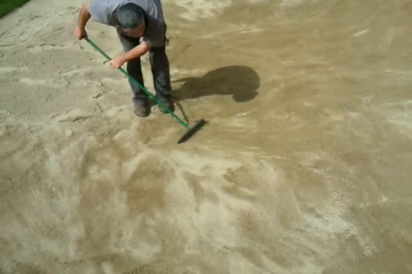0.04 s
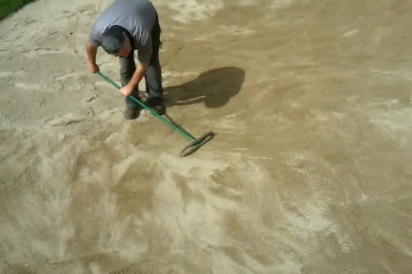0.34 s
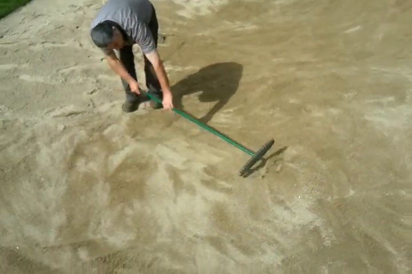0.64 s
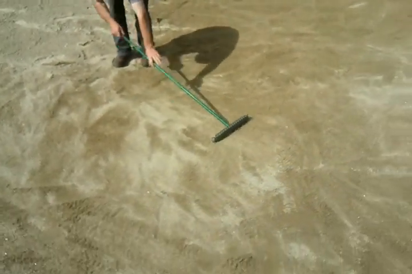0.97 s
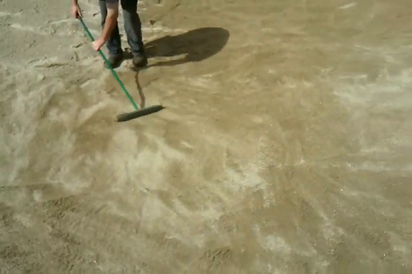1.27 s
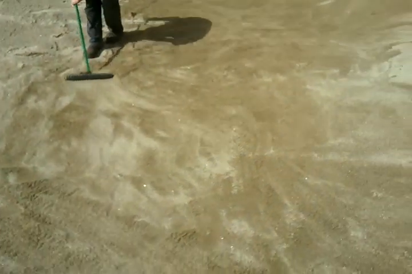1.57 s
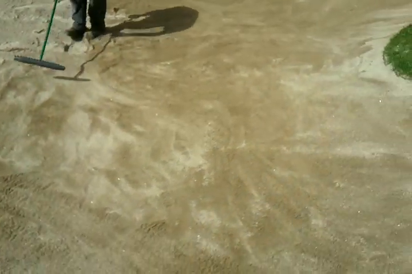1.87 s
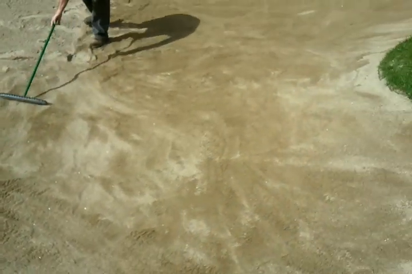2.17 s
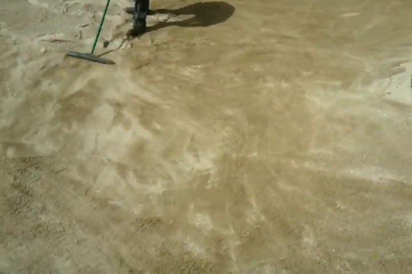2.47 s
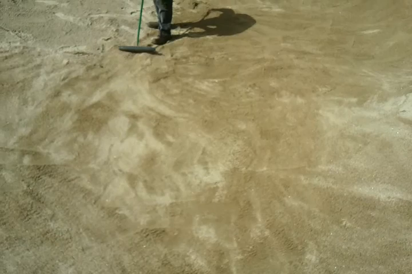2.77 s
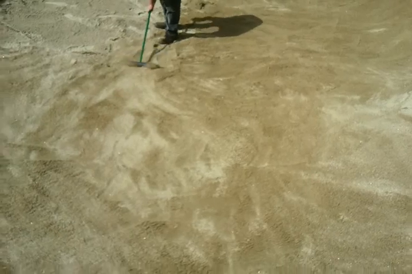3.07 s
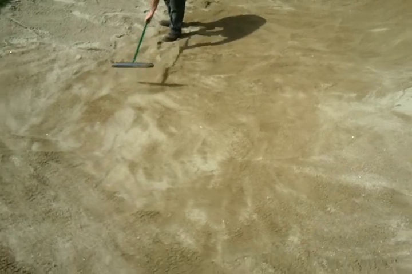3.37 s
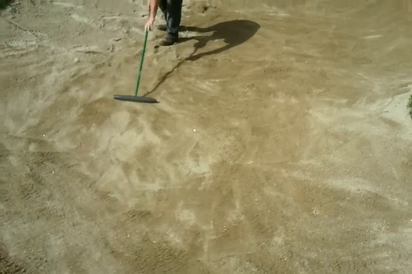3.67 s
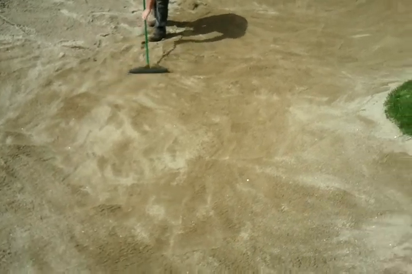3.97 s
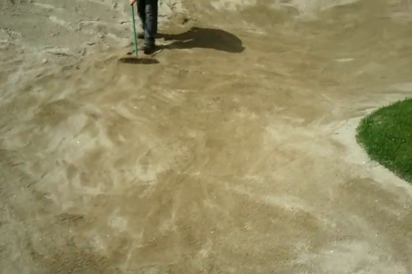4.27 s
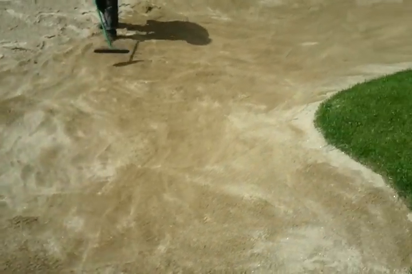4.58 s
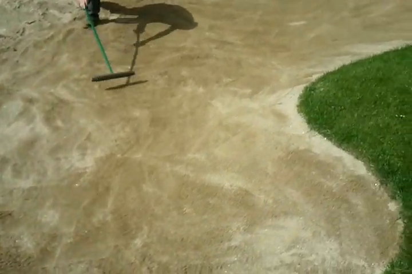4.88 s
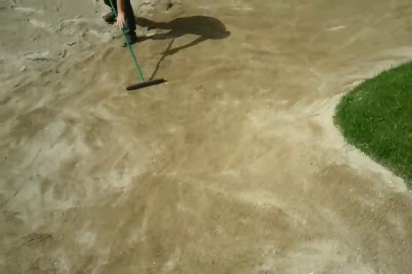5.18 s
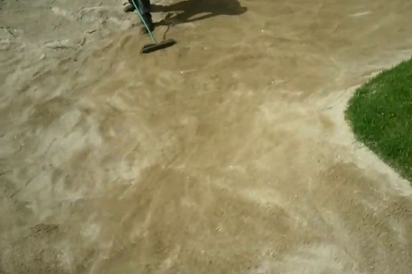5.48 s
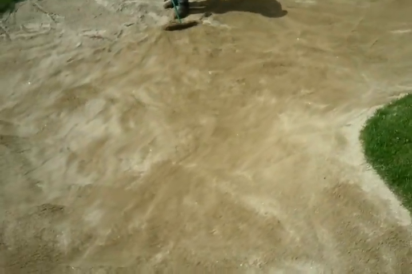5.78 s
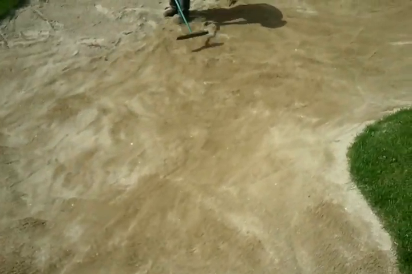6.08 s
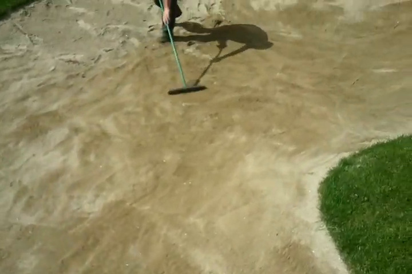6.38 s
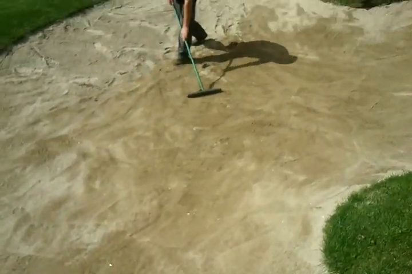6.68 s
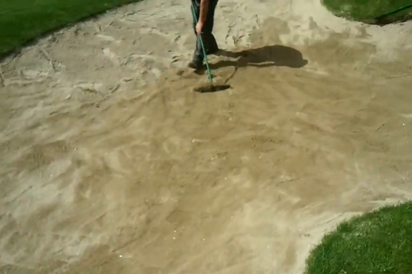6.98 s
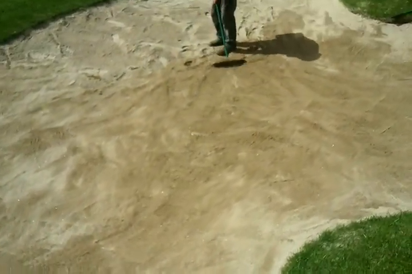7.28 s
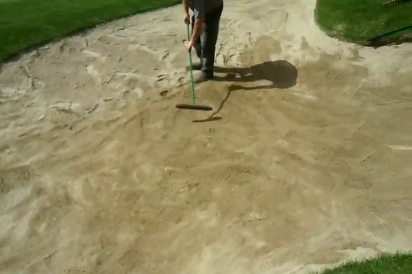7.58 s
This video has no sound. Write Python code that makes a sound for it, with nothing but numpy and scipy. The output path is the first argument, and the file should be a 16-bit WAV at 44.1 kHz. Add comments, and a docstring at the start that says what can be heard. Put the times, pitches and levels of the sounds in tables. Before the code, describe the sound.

A rake is pushed and pulled through sand a few metres away, making soft, gritty scrapes over a steady rush of wind in distant trees. After about a second, gusts start to rumble on the hand-held microphone, growing much stronger midway with thumps and sharp pops. A thin hiss climbs in pitch and the camera casing clicks hard twice. Faint raking and loud gusts continue to the end.

```python
"""A rake is pushed and pulled through bunker sand, a few metres from a hand-held camera,
over the far rush of wind in trees. From about 1 s gusts buffet the microphone;
from 3.4 s the strongest eddies slap it. The camera's casing ticks faintly in the hand,
a thin hiss climbs in pitch, the casing clicks hard, and near 6 s the far rush turns duller.
Raking and gusts go on to the end."""
import sys
import numpy as np
from scipy import signal
from scipy.fft import rfft, irfft, next_fast_len
from scipy.io import wavfile
from scipy.ndimage import uniform_filter1d, map_coordinates

SR = 44100
rng = np.random.default_rng(int(sys.argv[2]) if len(sys.argv) > 2 else 0)


def generate_wav(sig):
    """Save sig (samples, or channels by samples) to the path in sys.argv[1] as 16-bit PCM at SR."""
    pcm = np.round(np.clip(np.atleast_2d(sig).T, -1, 1) * 32767).astype(np.int16)
    wavfile.write(sys.argv[1], SR, pcm)


N = 336924
TIME_S = np.arange(N) / SR

# rake strokes: t/s, attack/s, hold/s, release/s, scrape level/dB, spray re scrape/dB
STROKES = [(0, 0.0022, 0.1, 0.091, -47.5, 1.5), (0.323, .05, 0.26, .05, -51.5, 1.5),
           (0.515, .06, .11, 0.032, -46, -1.5), (1.033, 0.2, .08, .42, -46, -3),
           (1.902, 0.092, 0.12, 0.13, -50.5, -8.5), (2.27, 0.24, 0.26, 0.11, -52, 1),
           (3.145, 0.026, 0.091, 0.13, -49.5, -2), (3.815, .17, 0.067, 0.21, -47.5, -3.5),
           (4.298, 0.68, 0.42, .3, -48, -7.5), (5.665, .05, .02, 0.049, -45, -5),
           (5.775, 0.038, 0.14, 0.11, -63, 4), (6.383, 0.096, 0.12, .12, -52.5, -6.5),
           (6.648, 0.082, .03, 0.33, -48.2, -3), (7.106, 0.066, .02, 0.046, -47, -13),
           (7.295, 0.081, 0.082, .15, -54, -5.5)]
# sand spectra, one per rake pose: f/Hz, level/dB
SAND_PUSHED = [(1200, -15), (2300, 3), (2600, -4), (2900, 2), (3550, -7), (4000, 2.5), (4550, -11.5),
               (5300, -0.5), (5800, 0.5), (6250, -7.5), (6700, -0.5), (7100, -8), (7450, -4.5), (8800, -12)]
SAND_PULLED = [(1100, -19.5), (2300, 5.5), (2650, -1.5), (3200, 2.5), (3600, -2), (3950, -2), (4400, -6),
               (5000, -3.5), (5400, -3), (6200, -1), (6600, -5.5), (6950, -6.5), (8800, -16)]
SAND_TURNED = [(1200, -5), (2300, 5.5), (2600, -1.5), (3000, 0), (3250, 3.5), (3650, -8.5), (3950, -3.5),
               (4350, -11.5), (4850, -1.5), (5250, -5), (5750, 1.5), (6300, -6), (6850, -4.5), (8800, -15)]
SAND_FAR = [(1200, -7), (2200, -1), (2900, 1.5), (3600, -1), (4400, -1.5), (5400, -3.5), (6100, -2.5),
            (7200, -8.5), (8800, -17.5)]
# envelope of the far rush: t/s, level/dB
TREES_ENVELOPE = [(0, -42.5), (3.1, -43.5), (4.2, -43.5), (4.7, -43.5), (5.7, -42.5), (6.0, -45),
                  (7.64, -45.5)]
# spectra of the far rush: f/Hz, level/dB
TREES_BRIGHT = [(25, -33.5), (70, -8.5), (140, -6), (450, -2.5), (800, 1.5), (1100, 1.5), (1500, -0.5),
                (1800, -4), (2200, -15.5), (3200, -15.5), (6000, -24), (8800, -40)]
TREES_DULL = [(25, -20), (150, -3.5), (450, -5.5), (800, 0), (1050, -2.5), (1350, -6.5), (1700, -11.5),
              (2200, -15), (3200, -19), (6000, -22.5), (8800, -50)]
# rake biting into sand: t/s, level/dB, decay/s, f/Hz, bandwidth/Hz
BITES = [(0.61, -48, 0.098, 3980, 1800), (0.63, -43, 0.013, 2680, 1600), (1.028, -47.5, 0.033, 6500, 3900),
         (1.029, -42, 0.025, 3200, 2500), (1.09, -53, .18, 3950, 600), (1.17, -53, 0.14, 5460, 600),
         (2.32, -48, .03, 5650, 1500), (2.408, -51.5, 0.081, 5650, 800), (2.446, -33, 0.0054, 2300, 1600),
         (3.158, -48, .03, 4540, 3410), (3.16, -50.5, 0.21, 2960, 547)]
# gusts on the microphone: t/s, hold/s, level/dB
GUSTS = [(1.102, .03, -44), (1.335, .045, -38), (1.572, 0.0089, -38), (1.656, 0.041, -34),
         (1.936, 0.021, -41.5), (2.352, 0.54, -35.5), (3.39, .87, -26.3), (3.63, 0.19, -24),
         (4.19, 0.056, -21.5), (4.31, .1, -30), (4.44, .065, -16.2), (4.949, .22, -32.5), (5.4, 0.16, -38),
         (5.56, 1.174, -27.5), (6.42, .085, -16.3), (6.777, .18, -29.5), (7.001, .14, -34.5),
         (7.598, 0.047, -23)]
# single eddies that thump: t/s, level/dB
PUFFS = [(1.356, -30), (1.452, -33), (1.68, -25.5), (2.504, -25.5), (2.544, -23.5), (2.593, -23),
         (2.75, -26), (2.833, -28), (2.882, -27.5), (3.259, -26), (3.312, -31), (3.339, -29.5),
         (3.377, -19), (3.488, -18.5), (3.528, -20.5), (3.655, -17), (3.78, -17), (3.888, -18),
         (4.098, -18), (4.168, -16), (4.331, -18.5), (4.389, -17.5), (4.545, -19.5), (4.969, -25.5),
         (5.124, -19.5), (5.217, -27), (5.324, -26.5), (5.584, -21.5), (5.703, -18.5), (5.75, -16),
         (5.811, -16.5), (5.835, -16), (5.885, -19.5), (6.307, -19), (6.332, -18.5), (6.614, -20),
         (6.653, -18.5), (6.742, -17.5), (6.867, -19.5), (6.952, -22), (7.148, -16.5), (7.309, -31),
         (7.358, -18), (7.434, -26.5)]
# spectra of wind on the microphone: f/Hz, level/dB
RUMBLE = [(20, -27.5), (45, -18), (80, -6.5), (130, 1.5), (270, 0), (400, -6), (560, -14.5), (800, -32.5),
          (1200, -43), (2500, -74.5)]
TURBULENCE = [(200, -17), (500, -2.5), (800, -4), (1200, -14.5), (1800, -21), (2600, -26), (7000, -49)]
# eddies breaking on the microphone port: t/s, level/dB
SLAPS = [(3.413, -4.5), (3.418, -4.5), (3.567, -8.5), (3.683, -9.5), (3.749, -11), (3.795, -4),
         (3.98, -8.5), (4.169, -7.5), (4.213, -2), (4.237, -5), (4.273, -14), (4.441, 0), (4.461, -3.5),
         (4.495, -5), (6.218, -10.5), (6.391, -9.5), (6.408, -9), (6.412, -5.5), (6.433, -8.5), (6.45, -8),
         (6.478, -7.5), (6.552, -5.5), (6.71, -8.5), (6.953, -11.5), (7.612, -3.5), (7.633, -8)]
# casing clicks: t/s, peak level/dB, low-mode gain/dB
CLICKS = [(3.759, -37, -4), (3.78, -24.5, -32), (5.036, -28, -26), (5.5933, -10, -5.5), (5.597, -18.5, 0.5),
          (5.638, -19.5, -25), (5.6739, -21.5, -10.5), (5.847, -5.5, -1)]
# casing modes: f/Hz, level/dB, T60/s
CASING_MODES = [(1780, 4, 0.0022), (3460, -8, 0.0049), (5630, -9, 0.0059), (6240, -6, 0.004),
                (6800, -2.5, 0.0025)]
# hiss swells: centre t/s, level/dB, sigma/s, f/Hz, bandwidth/Hz
HISS_SWELLS = [(4.65, -55.5, 0.13, 4180, 900), (4.82, -53.5, 0.16, 3320, 400.5),
               (5.052, -49, 0.49, 1890, 905), (5.204, -45.5, 0.15, 4200, 1000),
               (5.467, -46, 0.13, 5730, 750)]


def amp(db):
    """Decibels to gain."""
    return 10 ** (np.asarray(db) / 20)


def unit(x):
    """x at rms 1."""
    return x / np.sqrt(np.mean(x ** 2) + 1e-20)


def noise():
    """White noise."""
    return rng.standard_normal(N)


def wobble(rate_hz):
    """Smooth curve through random knots."""
    return map_coordinates(rng.standard_normal(int(N * rate_hz / SR) + 4), [TIME_S * rate_hz])


def filtered(x, response):
    """x through a frequency response."""
    size = next_fast_len(N + 8192)
    return irfft(rfft(x, size) * response(np.fft.rfftfreq(size, 1 / SR)), size)[:N]


def coloured(x, spectrum):
    """x shaped by a spectrum table, at rms 1."""
    knots_hz, db = np.transpose(spectrum)
    return unit(filtered(x, lambda hz: amp(np.interp(np.log(hz + 1), np.log(knots_hz), db))))


def resonant(x, centre_hz, width_hz):
    """x through a steep-sided resonance, at rms 1."""
    def response(hz):
        damping = 1j * hz * width_hz
        return (damping / (centre_hz ** 2 - hz ** 2 + damping)) ** 2
    return unit(filtered(x, response))


def add(track, t_s, sound):
    """Mix sound into track at t_s."""
    start = int(np.clip(round(t_s * SR), 0, N - 1))
    track[start:start + len(sound)] += sound[:N - start]


def grains(rate_hz, spread_db):
    """Tiny sand collisions of uneven size."""
    return unit(noise() * (rng.random(N) < rate_hz / SR) * amp(spread_db * noise()))


def patchy(x, depth_db):
    """The scrape's colour drifts at random, in shifting peaks and dips."""
    bins = signal.stft(x, nperseg=512)[2]
    patches = uniform_filter1d(rng.standard_normal(bins.shape), size=5, axis=0)
    patches = unit(uniform_filter1d(patches, size=30, axis=1))
    return unit(signal.istft(bins * amp(depth_db * patches), nperseg=512)[1][:N])


def rake(trickle_db=-61, trickle_spray_db=-64.5, spray_hz=4700, clump_db=0.25, clump_rate_hz=45):
    """Tines shear sand in small clumps: coarse scrape and fine spray over a loose trickle."""
    scrape_power, spray_power = amp(trickle_db) ** 2, amp(trickle_spray_db) ** 2
    for t_s, attack_s, hold_s, release_s, db, spray_db in STROKES:
        age_s = TIME_S - t_s
        dig = np.clip(age_s / attack_s, 0, 1)
        ease = np.exp(-np.maximum(age_s - attack_s - hold_s, 0) / release_s)
        pressure = amp(db) * dig * ease
        scrape_power += pressure ** 2
        spray_power += (amp(spray_db) * pressure) ** 2
    poses = [coloured(grains(rate_hz=9000, spread_db=0.5), spectrum)
             for spectrum in (SAND_PUSHED, SAND_PULLED, SAND_TURNED, SAND_FAR)]
    pose_changes_s = [.9, 2.28, 4.4]
    sand = patchy(np.choose(np.searchsorted(pose_changes_s, TIME_S), poses), depth_db=1.4)
    spray = filtered(sand, lambda hz: 1 / (1 + (spray_hz / (hz + 1)) ** 8))
    clumps = amp(clump_db * wobble(clump_rate_hz))
    return clumps * (np.sqrt(scrape_power) * unit(sand - spray) + np.sqrt(spray_power) * unit(spray))


def trees(dull_at_s=5.85, crossfade_s=.04, gain_db=2.0, sway_db=.4):
    """Far wind in trees: a steady rush that turns duller late on."""
    level_db = np.interp(TIME_S, *np.transpose(TREES_ENVELOPE))
    dullness = np.clip((TIME_S - dull_at_s) / crossfade_s + .5, 0, 1)
    bright = np.sqrt(1 - dullness) * coloured(noise(), TREES_BRIGHT)
    dull = np.sqrt(dullness) * coloured(noise(), TREES_DULL)
    return amp(level_db + gain_db + sway_db * wobble(rate_hz=8)) * (bright + dull)


def bites():
    """The rake lands or catches; a short crunch of grains rings in its head."""
    out = np.zeros(N)
    for t_s, db, decay_s, hz, width_hz in BITES:
        age = np.maximum(TIME_S - t_s, 0) / decay_s
        crunch = resonant(grains(rate_hz=9000, spread_db=3), hz, width_hz)
        out += amp(db) * np.tanh(10 * age) * np.exp(-age ** 2) * crunch
    return out


def gusts(rise_s=.024, fall_s=.026, breeze_db=-52, breeze_full_s=1.5, build_db_per_s=15):
    """Wind envelope: gusts swell, hold and sink over a breeze that builds, then holds."""
    power = amp(breeze_db - build_db_per_s * np.maximum(breeze_full_s - TIME_S, 0)) ** 2
    for t_s, hold_s, db in GUSTS:
        fade = np.maximum(t_s - TIME_S, 0) / rise_s + np.maximum(TIME_S - t_s - hold_s, 0) / fall_s
        power += (amp(db) * np.exp(-fade)) ** 2
    return np.sqrt(power)


def eddies(wind, sputter_db=6, sputter_rate_hz=90, lull_db=5, lull_rate_hz=70, steady_db=-11):
    """Eddies break the wind envelope into sputter and puffs; toward steady_db the sputter evens out."""
    lull = np.clip(wobble(lull_rate_hz), 0, 1)
    sputter = unit(amp(sputter_db * np.tanh(1.3 * wobble(sputter_rate_hz)) - lull_db * lull))
    steady = np.clip(wind / amp(steady_db), 0, 1) ** 2
    power = wind ** 2 * (steady + (1 - steady) * sputter ** 2)
    puff = signal.windows.gaussian(round(.03 * SR), std=.0043 * SR)
    for t_s, db in PUFFS:
        add(power, t_s - len(puff) / 2 / SR, (amp(db) * puff) ** 2)
    return np.sqrt(power)


def buffeting(reference_db=-22, tearing_db=-21.5, bass_cut_hz=40):
    """Wind on the microphone: faster air rumbles higher; hard blasts tear into bright turbulence."""
    force = eddies(gusts())
    strength = force / amp(reference_db)
    swirl = coloured(noise(), RUMBLE)
    # levelled, so each puff sets its own size
    swirl_power = uniform_filter1d(uniform_filter1d(swirl ** 2, size=400), size=400)
    swirl = unit(swirl / np.sqrt(np.abs(swirl_power) + 0.067))
    travel_samples = np.cumsum(np.maximum(strength, .1) ** .17)
    rumble = force * map_coordinates(swirl, [travel_samples], mode="mirror")
    tearing = amp(tearing_db) * force * strength ** 0.99 * coloured(noise(), TURBULENCE)
    return signal.sosfilt(signal.butter(3, bass_cut_hz, "high", fs=SR, output="sos"), rumble + tearing)


def slaps(base_width_ms=.36, blunting_ms_per_db=.008, tip_ms=.14, gain_db=4.9, bass_cut_hz=210):
    """A breaking eddy is a pressure cusp, blunter if weak; the microphone's bass cut swings it back."""
    out = np.zeros(N)
    lead_s = .01
    offset_ms = (np.arange(round(2 * lead_s * SR)) / SR - lead_s) * 1000
    for t_s, db in SLAPS:
        width_ms = base_width_ms - blunting_ms_per_db * db
        cusp = np.exp(-np.hypot(offset_ms, tip_ms) / width_ms)
        add(out, t_s - lead_s, rng.choice([-1, 1]) * amp(db + gain_db) * cusp / cusp.max())
    return signal.sosfilt(signal.butter(2, bass_cut_hz, "high", fs=SR, output="sos"), out)


def clicks(low_modes_below_hz=4500, scatter_db=1.4, burst_t60_s=.005, attack_s=.00011):
    """The plastic casing snaps: a noise burst and briefly ringing modes."""
    out = np.zeros(N)
    age_s = np.arange(SR // 20) / SR
    for t_s, peak_db, low_db in CLICKS:
        ring = np.zeros(len(age_s))
        for hz, mode_db, t60_s in CASING_MODES:
            start_db = mode_db + low_db * (hz < low_modes_below_hz) + rng.normal(0, scatter_db)
            ring += amp(start_db - 60 * age_s / t60_s) * np.sin(2 * np.pi * (hz * age_s + rng.random()))
        burst = 0.24 * amp(-60 * age_s / burst_t60_s) * rng.standard_normal(len(age_s))
        snap = (ring + burst) * (1 - np.exp(-age_s / attack_s))
        add(out, t_s, amp(peak_db) * snap / np.abs(snap).max())
    return out


def hiss():
    """Thin hiss: overlapping narrow noise bands swell, the highest last."""
    out = np.zeros(N)
    for t_s, db, sigma_s, hz, width_hz in HISS_SWELLS:
        swell = np.exp(-.5 * ((TIME_S - t_s) / sigma_s) ** 2)
        out += amp(db) * swell * resonant(noise(), hz, width_hz)
    return out


def scene():
    """All sources at one microphone."""
    return (rake() + trees() + bites() + buffeting() + slaps() + clicks() + hiss())[None]


def record(dry, ceiling=.72, band_limit_hz=8900):
    """The camera rounds off peaks; its treble sags, then ends at the band limit."""
    rounded = dry[0] / (1 + np.abs(dry[0] / ceiling) ** 6) ** (1 / 6)
    faded = rounded * signal.windows.tukey(N, .001)
    response_hz, response_db = [7350, 7950, 8620, 9040], [1.0, -11.0, -11.5, -26.5]
    response = lambda hz: amp(np.interp(hz, response_hz, response_db)) * (hz < band_limit_hz)
    return filtered(faded, response)[None]


dry = scene()
out = record(dry)
generate_wav(out)
```